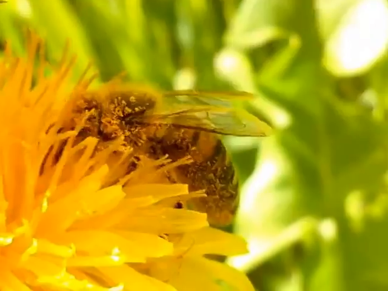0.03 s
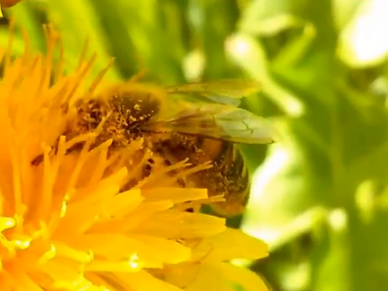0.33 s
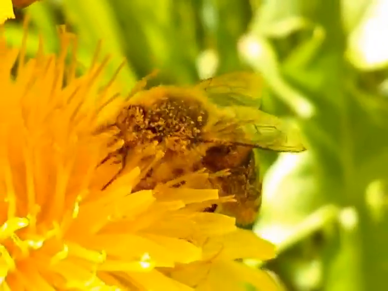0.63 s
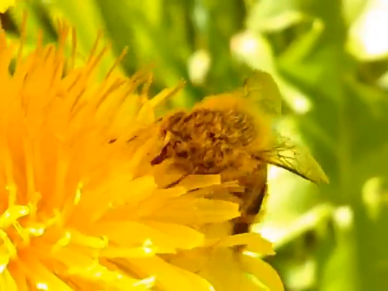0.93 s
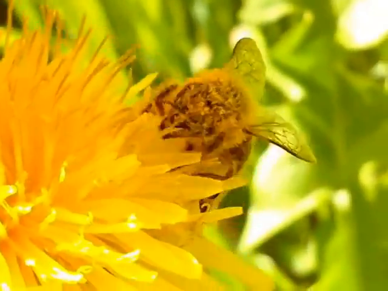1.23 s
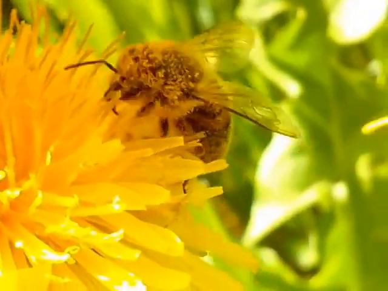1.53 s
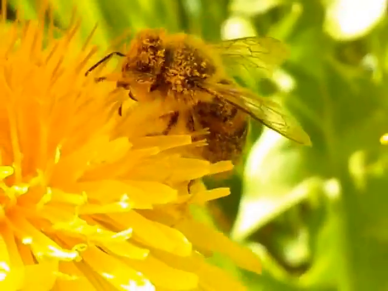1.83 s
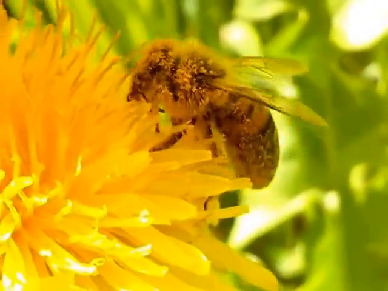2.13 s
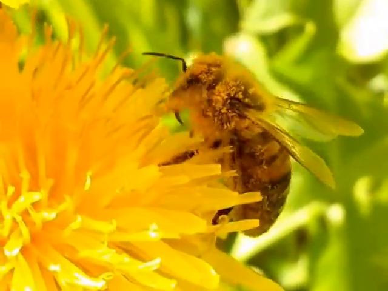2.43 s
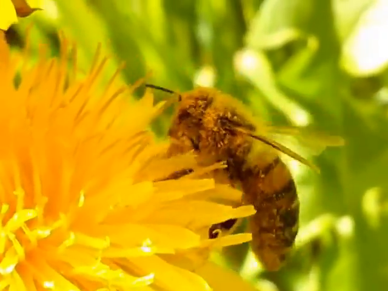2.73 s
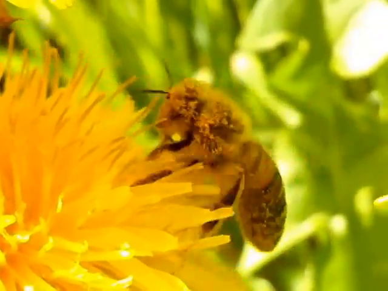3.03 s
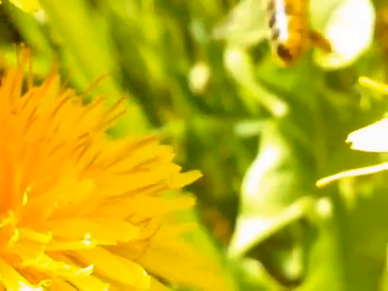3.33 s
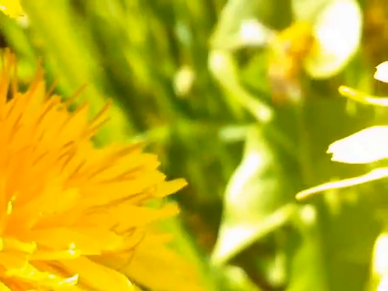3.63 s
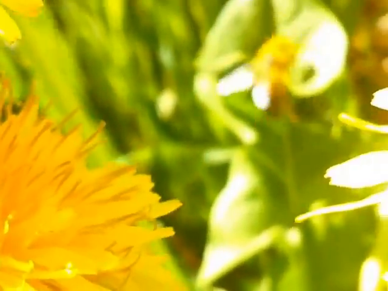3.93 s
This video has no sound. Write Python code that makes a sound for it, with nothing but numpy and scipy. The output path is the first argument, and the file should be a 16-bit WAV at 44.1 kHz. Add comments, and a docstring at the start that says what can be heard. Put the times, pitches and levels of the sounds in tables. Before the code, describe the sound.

A bee buzzes softly close by from about 3 seconds, its wings ticking against petals and leaves around 3.3 and 3.6 seconds before it fades away. Earlier, other bees hum very faintly over a low outdoor rumble and hiss. Small handling bumps and rustles come between 1 and 2.4 seconds. Distant birds chirp near 0.3 and 1.1 seconds, and most clearly around 2.3.

```python
"""Outdoors, beside a flower. A honeybee clambers over it close by, then flies off: its periodic
wingbeat radiates a harmonic buzz, and its wings tick against petals and leaves. Other bees hum
faintly nearby, and small birds chirp in the distance, frequency-modulated whistles with echoes.
Handling makes small bumps (impact) and rustles (friction) over a low rumble, a faint drone and hiss."""
import sys
import numpy as np
from scipy import signal
from scipy.fft import rfft, irfft
from scipy.io import wavfile

SR = 44100
rng = np.random.default_rng(int(sys.argv[2]) if len(sys.argv) > 2 else 0)


def transcribe(signal):
    """Save signal, clipped to [-1, 1], as a 16-bit WAV file at the path in sys.argv[1]."""
    frames = np.atleast_2d(signal).T
    limited = np.clip(frames, -1, 1)
    pcm = np.round(limited * 32767).astype(np.int16)
    wavfile.write(sys.argv[1], SR, pcm)


N = 176400

# Spectra of the outdoor background: frequency_hz, relative_density_db
RUMBLE_SPECTRUM = [(15, 1), (35, -3), (58, 0), (75, -3), (100, -7), (150, -10), (260, -18.5), (600, -28.5),
                   (1200, -48)]
HISS_SPECTRUM = [(300, 10), (800, 5.5), (2500, 0.5), (5000, -0.5), (8000, -4.5), (12500, -7), (14000, -29)]
# Rubbing from handling: start_s, length_s, crackle_db, rub_db
RUSTLE_EVENTS = [(0.282, 0.028, -69, -70.5), (0.83, 0.7, -81.5, -71), (1.332, 0.04, -74, -82),
                 (1.439, 0.038, -69.5, -64), (1.464, 0.1, -74, -69.5), (1.942, 0.029, -72, -66.5),
                 (2.002, 0.069, -66, -70.5)]
# Impacts from handling: start_s, click_db, thud_db
BUMP_EVENTS = [(1.0190, -54, -86), (1.162, -58, -50), (1.164, -52.5, -67), (1.4516, -64, -70),
               (1.4554, -51.5, -68), (1.4593, -52.5, -64), (1.4743, -56, -72), (1.5068, -57, -53),
               (1.962, -62, -68), (1.9743, -57, -81), (2.363, -78, -53.5)]
# Spectra of the handling sounds: frequency_hz, relative_density_db
RUB_SPECTRUM = [(400, 3), (700, -1.5), (1000, -2), (1400, -11), (5000, -25)]
CLICK_SPECTRUM = [(1500, -4.5), (4500, -0.5), (8000, -7), (13000, -3), (16000, -9.5)]
THUD_SPECTRUM = [(170, 2.5), (400, -16.5), (1000, -21.5), (2500, -20.5), (6000, -81)]
# Bird chirps: rasp_fraction (of the pitch), contour of (time_s, pitch_hz, level_db)
BIRD_CHIRPS = [ (0.093, [(.29, 2060, -81), (.325, 2750, -78.5), (.346, 2940, -71), (.351, 2800, -74),
               (.379, 3750, -73), (.391, 3700, -87)]), (.06, [(.33, 1280, -85), (.372, 1680, -84)]),
               (0.021, [(1.0, 5700, -76.5), (1.046, 5290, -78), (1.057, 3800, -68.5), (1.067, 3080, -74),
               (1.098, 2835, -62), (1.138, 2320, -74)]), (0.029, [(2.266, 2890, -74), (2.275, 4450, -61),
               (2.292, 5030, -57), (2.298, 4060, -57.5), (2.311, 4030, -52), (2.319, 3470, -62)]),
               (0.039, [(2.252, 4120, -73), (2.266, 5410, -72), (2.33, 5000, -71)]),
               (0.073, [(2.331, 3000, -61), (2.338, 3556, -55.5), (2.349, 3500, -53), (2.358, 3150, -60)]),
               (.11, [(2.362, 3090, -60), (2.392, 2820, -64)]), (0.072, [(2.505, 5430, -80),
               (2.565, 4540, -82)])]
# Other bees passing: start_s, length_s, start_hz, end_hz, fundamental_db, octave_db
BEE_PASSES = [(0.548, 0.99, 198, 155.8, -74.5, -81.5), (1.936, 0.44, 205, 184, -72, -77),
              (2.49, 0.208, 172, 158, -71, -78), (2.796, 0.39, 164.6, 144.2, -69, -77)]
# Wingbeat of the near bee in flight: time_s, rate_hz
WINGBEAT_RATE = [(2.991, 200.6), (3.12, 218.1), (3.231, 213.8), (3.282, 206.7), (3.5, 191.8), (3.6, 189.2),
                 (3.641, 200.5), (3.701, 191.4), (3.79, 196.1), (3.92, 186.1)]
# Its buzz, changing as it turns: time_s, fundamental_db, octave_db, overtones_db
BUZZ_LEVELS = [(2.96, -85, -104, -87), (3.08, -65.5, -71.5, -79.5), (3.22, -65, -75.5, -75),
               (3.35, -62.5, -71, -75), (3.425, -78, -80, -75.5), (3.47, -74, -68, -75),
               (3.6, -65, -77, -74), (3.7, -68.5, -81, -84.5), (4.0, -72, -80.5, -102)]
# Spectral envelope of its overtones: frequency_hz, relative_level_db
OVERTONE_SPECTRUM = [(600, 2), (800, -8), (1020, -2), (1200, -4.5), (1650, -5), (2000, -11.5), (3500, -20)]
# Its wings touching the plant: start_s, length_s, tick_db, scrape_db
WING_CONTACTS = [(3.108, 0.032, -57, -71.5), (3.326, 0.034, -49.5, -64.5), (3.3558, 0.048, -57.5, -66.5),
                 (3.608, 0.01, -48, -58), (3.615, 0.034, -50, -63), (3.644, 0.083, -63.5, -71.5),
                 (3.707, 0.019, -69, -79)]
# Spectrum of wing ticks, scrapes and air hiss: frequency_hz, relative_density_db
WING_NOISE_SPECTRUM = [(700, -5.5), (2000, -6.5), (4000, 1), (8500, 0), (12000, 2), (15000, -8)]


def from_db(db):
    """Decibels to amplitude ratio."""
    return 10 ** (np.asarray(db) / 20)


def unit_rms(x):
    """Normalisation to unit root mean square."""
    return x / np.sqrt(np.mean(x ** 2) + 1e-20)


def clock():
    """Time of each sample in seconds."""
    return np.arange(N) / SR


def in_time(rows):
    """Linear interpolation in time, one array per value column."""
    time_s, *columns = np.transpose(rows)
    return [np.interp(clock(), time_s, column) for column in columns]


def level_at(spectrum, hz):
    """Interpolation of decibels on a log-frequency axis."""
    frequency_hz, db = np.transpose(spectrum)
    return np.interp(np.log(np.maximum(hz, 1)), np.log(frequency_hz), db)


def drift(corner_hz):
    """Low-pass noise: a random wander of unit rms."""
    pole = np.exp(-20 * np.pi * corner_hz / SR)   # at a tenth of the sample rate
    slow = signal.lfilter([1], [1, -2 * pole, pole * pole], rng.standard_normal(N // 5))
    settled = unit_rms(slow[-(N // 10 + 1):])
    return np.interp(np.arange(N) / 10, np.arange(len(settled)), settled)


def colour(x, spectrum):
    """Minimum-phase filtering at unit power gain for white noise."""
    gain = unit_rms(from_db(level_at(spectrum, np.arange(N + 1) * SR / (2 * N))))
    cepstrum = irfft(np.log(gain))
    cepstrum[1:N] *= 2   # folding makes the response causal
    cepstrum[N + 1:] = 0
    return irfft(rfft(x, 2 * N) * np.exp(rfft(cepstrum)))[:N]


def noise(envelope, spectrum):
    """Source and filter: white noise under an envelope, then coloured."""
    return colour(envelope * rng.standard_normal(N), spectrum)


def swell(start_s, length_s):
    """Half-sine envelope."""
    return np.sin(np.pi * np.clip((clock() - start_s) / length_s, 0, 1))


def decay(hits, tau_s):
    """Damping: each impulse starts an exponential decay."""
    return signal.lfilter([1], [1, -np.exp(-1 / (tau_s * SR))], hits + 1e-18)


def background(rumble_db=-61.5, hiss_db=-73.5, drone_hz=84.56, drone_db=-70.5):
    """Slow random modulation swells a rumble and wavers a far drone, over stationary hiss."""
    phase = 2 * np.pi * np.cumsum(drone_hz * (1 + .02 * drift(5.7))) / SR
    drone = np.sqrt(2) * from_db(drone_db + 2 * drift(3.7)) * np.sin(phase)
    rumble = noise(from_db(rumble_db + drift(5.8)), RUMBLE_SPECTRUM)
    return rumble + drone + noise(from_db(hiss_db), HISS_SPECTRUM)


def grain(rate_hz, spread_db=4):
    """Log-normal amplitude modulation, which makes noise crackle."""
    return unit_rms(from_db(spread_db * drift(rate_hz)))


def rustles():
    """Friction noise: light rubbing gives a fine crackle over a soft low scuff."""
    crackle = sum(from_db(db) * swell(start_s, length_s) for start_s, length_s, db, _ in RUSTLE_EVENTS)
    rub = sum(from_db(db) * swell(start_s, length_s) for start_s, length_s, _, db in RUSTLE_EVENTS)
    return noise(crackle * grain(300), CLICK_SPECTRUM) + noise(rub, RUB_SPECTRUM)


def birds(flutter_hz=487, throb_share=0.45, flicker_db=2.2):
    """Fast frequency and amplitude modulation adds sidebands that make whistles hoarse."""
    t, song = clock(), np.zeros(N)
    flutter = np.sin(2 * np.pi * flutter_hz * t + drift(100))
    for rasp, contour in BIRD_CHIRPS:
        hz, db = in_time(contour)
        gate = np.clip(np.minimum(t - contour[0][0], contour[-1][0] - t) / .002, 0, 1)
        phase = 2 * np.pi * np.cumsum(hz * (1 + .015 * drift(124) + rasp * flutter)) / SR
        throb = np.exp(throb_share * rasp * hz / flutter_hz * flutter)   # louder as the pitch peaks
        song += np.sqrt(2) * gate * throb * from_db(db + flicker_db * drift(140)) * np.sin(phase)
    return song


def with_echoes(song, gain_db=-8.5, t60_s=0.3, cutoff_hz=3900):
    """Reverberation: convolution with decaying noise adds duller outdoor echoes."""
    response = rng.standard_normal(N) * from_db(-60 * clock() / t60_s)
    dulled = signal.sosfilt(signal.butter(4, cutoff_hz, fs=SR, output="sos"), song)
    return song + from_db(gain_db) * signal.fftconvolve(dulled, response / np.linalg.norm(response))[:N]


def other_bees():
    """Periodic wingbeats radiate dull two-harmonic hums that swell, glide down and fade."""
    hums = np.zeros(N)
    for start_s, length_s, start_hz, end_hz, fundamental_db, octave_db in BEE_PASSES:
        hz = np.interp(clock(), [start_s, start_s + length_s], [start_hz, end_hz])
        phase = 2 * np.pi * np.cumsum(hz * (1 + 0.013 * drift(10))) / SR
        hum = from_db(fundamental_db) * np.sin(phase) + from_db(octave_db) * np.sin(2 * phase)
        hums += np.sqrt(2) * swell(start_s, length_s) * hum
    return hums


def bumps(snap_db=7):
    """Impulsive excitation: each impact is a snap with a damped bright tail, over a duller thud."""
    start_s, click_db, thud_db = np.transpose(BUMP_EVENTS)
    clicks, thuds = np.zeros((2, N))
    onsets = (start_s * SR).astype(int)
    clicks[onsets], thuds[onsets] = from_db(click_db), from_db(thud_db)
    tails = decay(clicks, tau_s=0.0012) * rng.standard_normal(N)
    bright = colour(tails - from_db(snap_db) * clicks, CLICK_SPECTRUM)
    return bright + noise(decay(thuds, tau_s=0.0044), THUD_SPECTRUM)


def wing_buzz(beats, flicker_db=3.5, nasal_hz=1510, nasal_octaves=0.34, swish_fade_db_per_s=9):
    """Periodic forcing of the air radiates a harmonic series, with a puff of hiss on each stroke."""
    flight_s = clock() - BUZZ_LEVELS[0][0]
    fundamental, octave, upper = from_db(in_time(BUZZ_LEVELS)) * np.clip(flight_s * 20, 0, 1)
    phase = 2 * np.pi * beats
    mean_hz = np.mean(np.array(WINGBEAT_RATE)[:, 1])
    nasal_db = 7 * swell(start_s=3.42, length_s=0.22)   # the buzz goes nasal as the bee turns away
    overtones = 0
    for k in range(3, 20):
        nearness = np.exp(-(np.log2(k * mean_hz / nasal_hz) / nasal_octaves) ** 2)
        db = level_at(OVERTONE_SPECTRUM, k * mean_hz) + nasal_db * nearness + flicker_db * drift(42)
        overtones += from_db(db) * np.cos(k * phase + .5 * rng.normal())
    swish_db = 4 - swish_fade_db_per_s * flight_s   # relative to the overtones; fades with distance
    puffs = unit_rms(np.exp(1.1 * np.cos(phase)))
    swish = noise(upper * from_db(swish_db) * puffs, WING_NOISE_SPECTRUM)
    hum = fundamental * np.cos(phase) + octave * np.cos(2 * phase)
    hum *= from_db(flicker_db / 2 * drift(16))
    return np.sqrt(2) * hum + upper * unit_rms(overtones) + swish


def wing_brushes(beats):
    """Impact and friction: a wing touching the plant ticks once per beat and scrapes in between."""
    t = clock()
    strokes, scrape = np.zeros((2, N))
    for start_s, length_s, tick_db, scrape_db in WING_CONTACTS:
        touching = (t >= start_s) & (t < start_s + length_s)
        beats_since_touch = np.floor(beats - np.interp(start_s, t, beats))
        struck = np.diff(beats_since_touch, prepend=0) * touching
        contact = swell(start_s, length_s)
        strokes += struck * from_db(tick_db) * (2 + contact) / 3
        scrape += from_db(scrape_db) * contact
    return noise(decay(strokes, tau_s=0.0004) + scrape * grain(480), WING_NOISE_SPECTRUM)


def near_bee(jitter_fraction=0.01097):
    """Common excitation: one slightly unsteady wingbeat times both the buzz and the ticks."""
    rate_hz, = in_time(WINGBEAT_RATE)
    beats = np.cumsum(rate_hz * (1 + jitter_fraction * drift(40.3))) / SR
    return wing_buzz(beats) + wing_brushes(beats)


def scene():
    """Superposition: the pressures of all sources add at one point."""
    return (near_bee() + other_bees() + with_echoes(birds()) + bumps() + rustles() + background())[None]


def record(dry, cutoff_hz=15750, dc_offset=-.0048):
    """Band limiting: a steep low-pass cuts the top, and a small constant offset is added."""
    return signal.sosfilt(signal.ellip(12, .1, 70, cutoff_hz, fs=SR, output="sos"), dry) + dc_offset


dry = scene()
out = record(dry)
transcribe(out)
```